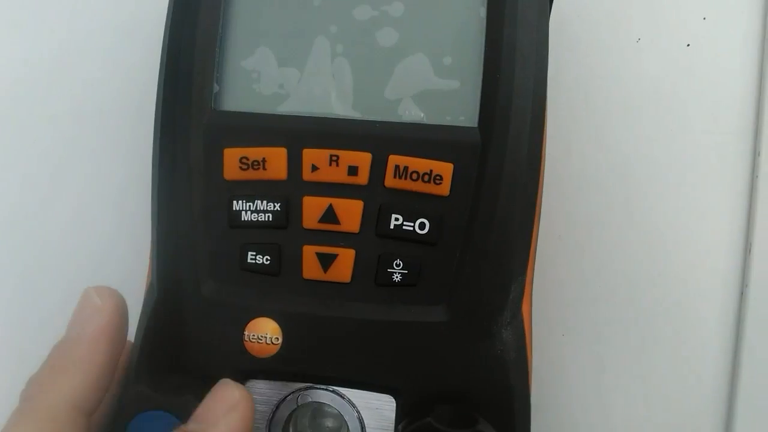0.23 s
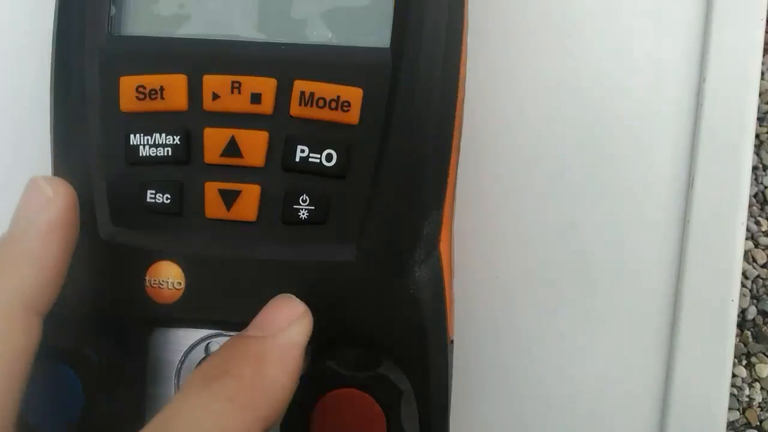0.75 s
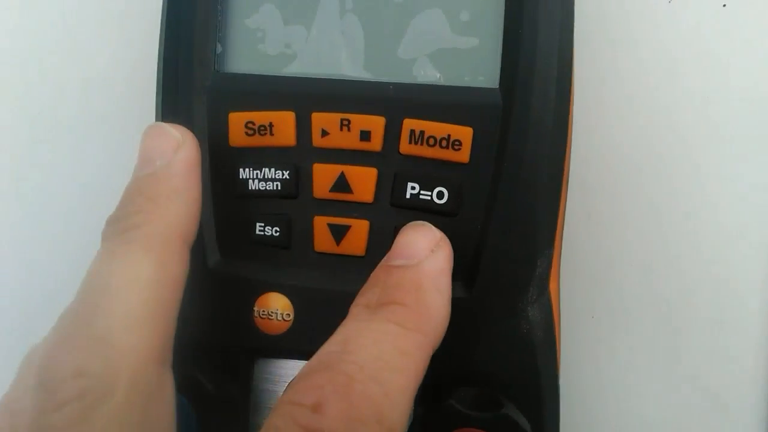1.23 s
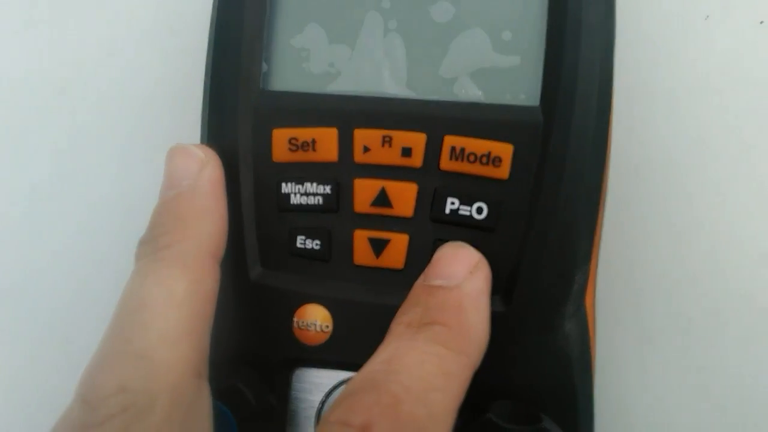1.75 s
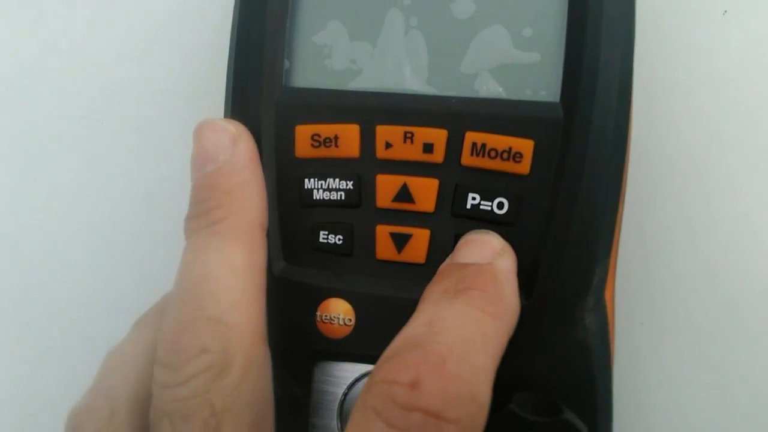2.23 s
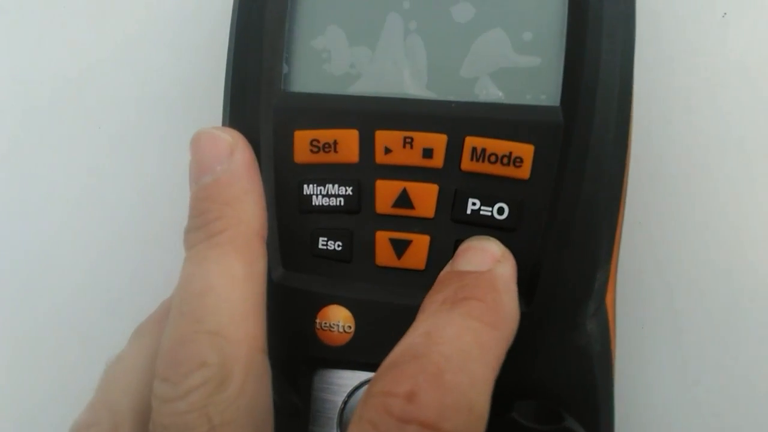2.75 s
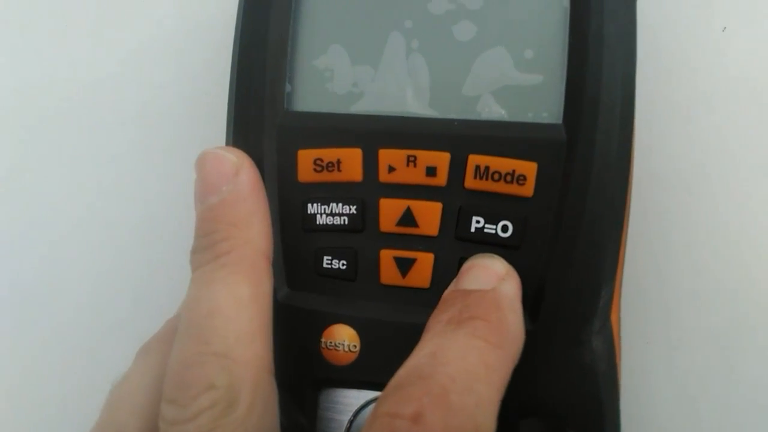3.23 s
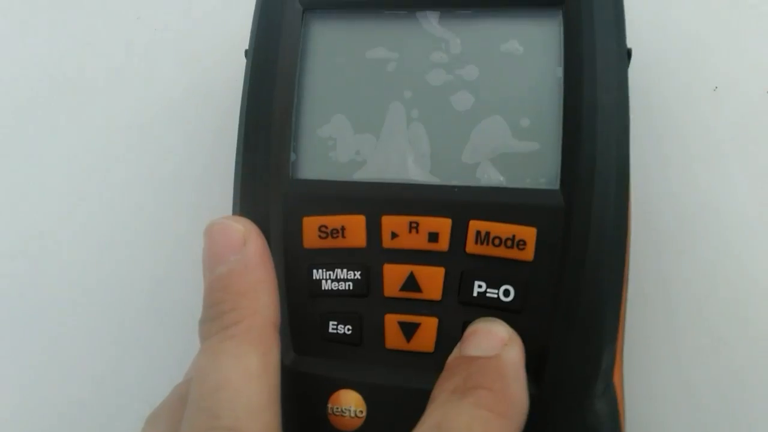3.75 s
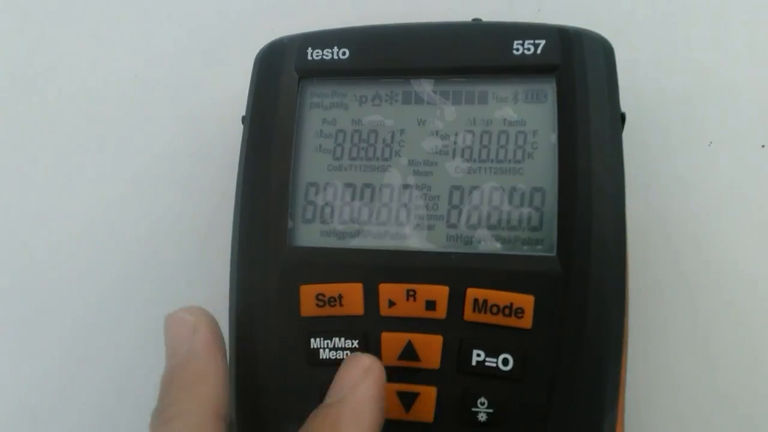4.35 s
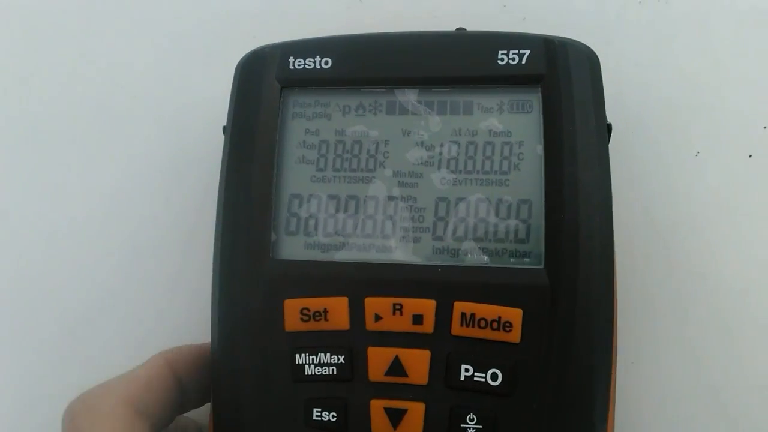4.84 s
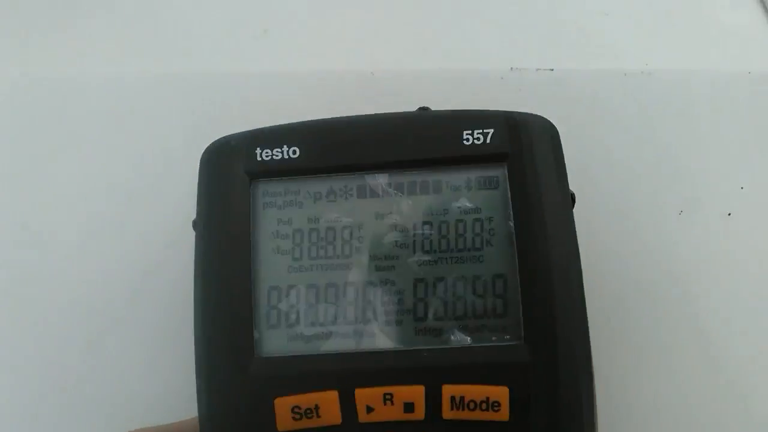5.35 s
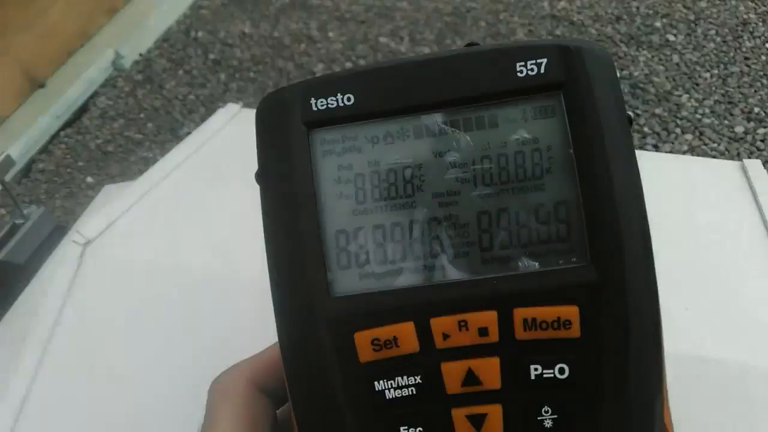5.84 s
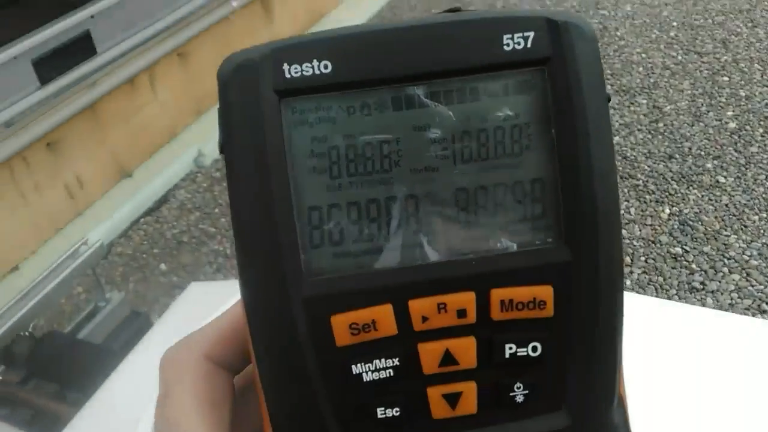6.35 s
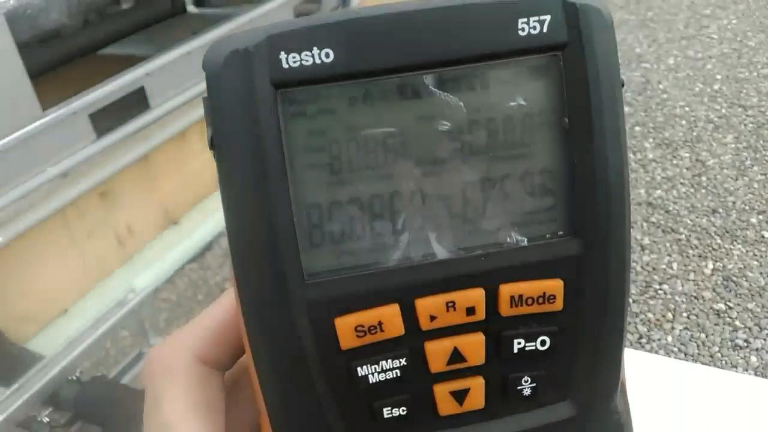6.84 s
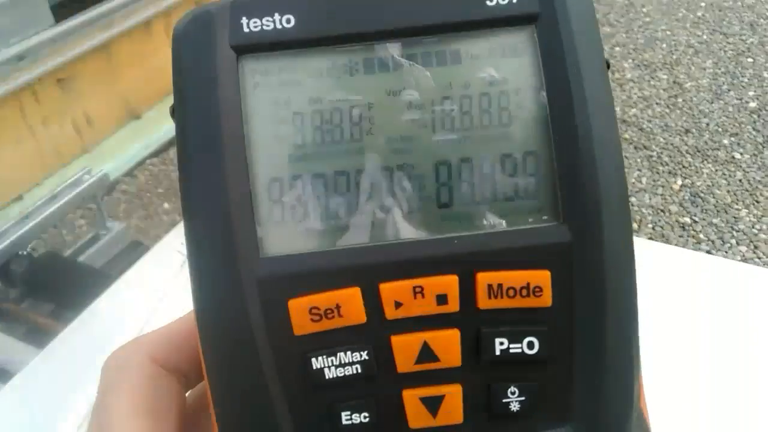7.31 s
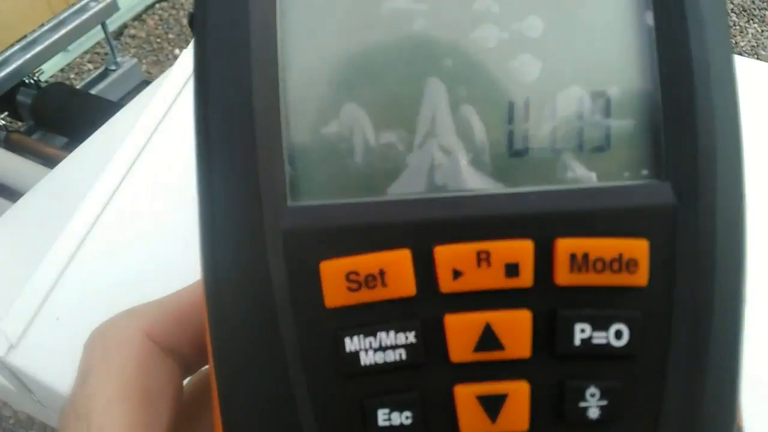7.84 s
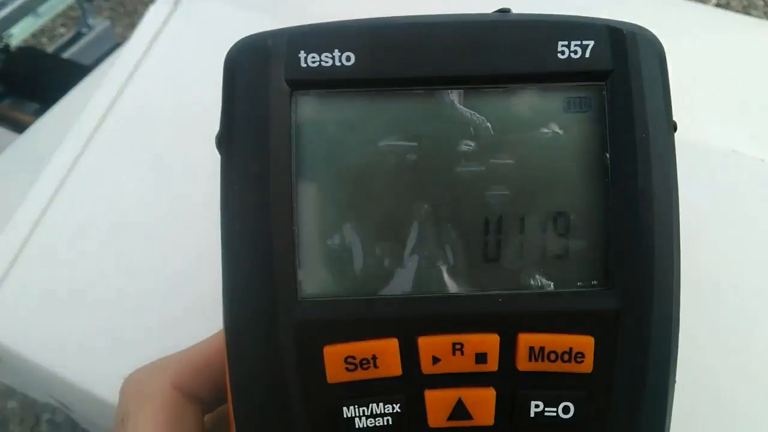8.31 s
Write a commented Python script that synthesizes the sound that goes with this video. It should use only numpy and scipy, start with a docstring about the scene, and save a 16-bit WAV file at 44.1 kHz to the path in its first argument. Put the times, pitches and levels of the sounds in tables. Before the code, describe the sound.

From 0 s a rooftop compressor and fan hum quietly, dipping slightly around 0.3 s and then swelling. Low tones around 150 Hz beat about eight times a second, a quick throb under a steadier mid-low drone, faint whine and rushing fan air. Gusts bulge near 0.6, 1 and 3.3 s. Soft, dull knocks cluster at 1.0-1.1 s, with smaller ones near 2, 2.8 and 3.3 s. From about 3.8 to 3.95 s everything cuts to silence, then returns abruptly, near full loudness. From 5.1 to 6.3 s the microphone rises over the casing: drone and motor hum fade, whine and airy hiss open up. Short sharper ticks land at 6.7 and 7.7 s. Toward 8.6 s the hum partly returns, still loud, ending without a fade. A coarse, gritty high sizzle from the poor microphone covers it throughout; no room echo.

```python
"""A rooftop condensing unit drones beside a hand-held camera: compressor and fan hum beat together.
The tones are sums of cosines; the air rushing through the coil is shaped noise, stronger or weaker in gusts.
All swells; as the camera rises above the casing the drone fades and the hiss opens. A few light knocks ring.
The recorder holds each sample of a telephone-rate stream, which adds a gritty sizzle, and drops out once."""
import sys
import numpy as np
from scipy import signal
from scipy.fft import rfft, irfft
from scipy.io import wavfile
from scipy.ndimage import uniform_filter1d, map_coordinates

SR = 44100
rng = np.random.default_rng(int(sys.argv[2]) if len(sys.argv) > 2 else 0)


def int16_out(signal):
    """Quantize to a 16-bit WAV file."""
    q = np.round(np.clip(np.atleast_2d(signal).T, -1, 1) * 32767)
    wavfile.write(sys.argv[1], SR, q.astype(np.int16))


N = 378378
TIME = np.arange(N) / SR  # s
# grid of the patchy noise: start of each frame in s, frequency of each bin in Hz
FRAME_S = np.arange(N // 256 + 5)[:, None] * 256 / SR
BIN_HZ = np.fft.rfftfreq(1024, 1 / SR)

# turns of the compressor shaft, passing fan blades and mains cycles per second
SHAFT_HZ, BLADE_HZ, MAINS_HZ = 29.378, 77.395, 60.01
# a crest of both throb tones, and how late the stream resumes (s)
THROB_AT, SLIP = 0.048, 0.064
# sample rate of the recorder's stream, and upper edge of the finished sound
STREAM_HZ, EDGE_HZ = 8000, 15800

# Tone levels are averages over the scene, before the recorder.
# low compressor tones: [multiple of the shaft rate, level/dB]
SHAFT_LOW = [(2, -36), (3, -40.5), (4, -26.5), (6, -31), (8, -41)]
# strong compressor drone: [multiple of the shaft rate, level/dB]
SHAFT_DRONE = [(9, -25)]
# middle compressor tones: [multiple of the shaft rate, level/dB]
SHAFT_MID = [(10, -42), (13, -43), (15, -51), (16, -53), (17, -52), (18, -51), (20, -51), (21, -47),
             (22, -45), (24, -48), (25, -50), (29, -52)]
# compressor whine: [multiple of the shaft rate, level/dB]
SHAFT_HIGH = [(34, -57), (38, -58), (44, -56), (47, -46.5), (52, -61), (60, -61), (62, -61)]
# fan tones: [multiple of the blade rate, level/dB]
BLADE_TONES = [(1, -40), (4, -40), (5, -40)]
# magnetic hum of the motor: [multiple of the mains rate, level/dB]
MAGNETIC_HUM = [(6, -29), (12, -67)]
# other steady tones of the casing: [f/Hz, level/dB]
CASING_TONES = [(246.9, -45), (254.8, -45), (301.3, -46), (418, -47), (477.5, -46), (506.9, -45.5),
                (595.1, -52), (653.7, -47), (866.9, -55), (1131.3, -57)]
# spectrum shapes of the three parts of the air noise: [f/Hz, relative level per Hz/dB]
RUMBLE_SHAPE = [(15, -24), (40, -29.5), (55, -5.5), (70, -7), (85, -3.5), (125, -0.5), (165, -4.5),
                (210, -4), (300, -26), (500, -37)]
RUSH_SHAPE = [(100, -31), (200, 2), (320, 4), (450, 0), (580, -2.5), (720, -1), (900, -9.5), (1200, -17.5),
              (2000, -20)]
HISS_SHAPE = [(400, -35), (850, 6.5), (1200, 4.5), (1600, 2.5), (2000, 1), (2400, -0.5), (2900, -5.5),
              (3400, -11.5), (3800, -18)]
# swell of the whole sound, of which each layer takes a share: [t/s, level/dB]
SWELL = [(0, -15.5), (.3, -17), (.7, -13), (1.2, -9), (1.65, -4.5), (2.3, -5.5), (3.2, -2), (4.2, -0.06),
         (5.4, -0.04), (6.3, 0.5), (7.3, -1.5), (8.0, 0.2), (8.58, 0)]
# microphone rising from beside the casing to above its top edge, then part way back: [t/s, lift 0-1]
LIFT = [(5.1, 0), (5.7, 0.23), (6.3, 0.99), (6.8, 1), (7.5, 0.82), (8.1, 0.73), (8.58, 0.4)]
# gusts of fan air, full size before each layer's share: [crest t/s, length/s, air level/dB, throb level/dB]
GUSTS = [(.58, 0.23, 7, -0.5), (0.983, 0.39, 10.5, 3.5), (1.707, 0.39, 2, 2), (2.097, 0.24, 2, 3),
         (2.72, 0.71, -2, 3), (3.284, 0.25, 8, 2.5), (3.676, 0.23, 0, 3), (4.4, .4, 2, -1),
         (4.88, 0.2, 2, -0.5), (5.548, 0.52, 4, 2.5), (6.12, 0.23, -5, 5.5), (7.206, 0.19, 5, 2),
         (7.78, 0.3, 5.5, 3.5), (8.095, 0.14, 4, 4)]
# light knocks of handling, before the recorder: [t/s, peak level/dB, middle f/Hz, time to fall 60 dB/s]
KNOCKS = [(0.986, -18, 345, 0.1), (1.023, -17, 350, 0.075), (1.126, -23, 350, .06),
          (2.045, -27.5, 720, 0.057), (2.817, -17.5, 714, 0.025), (3.264, -20, 810, 0.016),
          (6.692, -13.5, 910, .018), (7.719, -20, 1110, .013)]
# silent stretch of the stream: [start t/s, end t/s]
DROPOUT = (3.8125, 3.949)


def machine(clock):
    """Compressor, fan and motor tones; above the casing drone and motor hum fade and the whine comes through."""
    low = throb(clock, shaft_db=-25.0, fan_db=-22.5, surge_db=2.3)
    # the low shaft tones crest together: one soft thud for each turn of the compressor
    low += tones(SHAFT_LOW, SHAFT_HZ, clock - THROB_AT, waver=0.06, scatter=0.14)
    low += tones(BLADE_TONES, BLADE_HZ, clock, waver=0.68)
    drone = tones(SHAFT_DRONE, SHAFT_HZ, clock, waver=0.1)
    panels = tones(SHAFT_MID, SHAFT_HZ, clock, waver=0.35)
    panels += tones(CASING_TONES, 1, clock, waver=0.35)
    whine = tones(SHAFT_HIGH, SHAFT_HZ, clock, waver=0.25)
    magnetic = tones(MAGNETIC_HUM, MAINS_HZ, clock, waver=0.073)
    # evened gain curves move each layer over time but keep its average level
    return (low * evened(path(swell=0.97, lift_db=-2.0, throb_gust=1))
            + drone * evened(path(swell=0.96, lift_db=-8.5))
            + panels * evened(path(swell=1.3, lift_db=-6))
            + whine * evened(path(swell=1.15, lift_db=7.0))
            + magnetic * evened(path(swell=0.82, lift_db=-12)))


def throb(clock, shaft_db, fan_db, surge_db):
    """Five times the shaft rate and twice the blade rate lie 8 Hz apart and beat; some beats surge more."""
    angle = 2 * np.pi * (clock - THROB_AT)
    shaft = gain_of(shaft_db) * np.cos(5 * SHAFT_HZ * angle)
    fan = gain_of(fan_db) * np.cos(2 * BLADE_HZ * angle)
    surge = evened(gain_of(surge_db * wander(7.4)))
    return np.sqrt(2) * surge * (shaft + fan)


def tones(rows, base_hz, clock, waver, scatter=1):
    """Steady tones wavering in strength and phase; with little scatter (in turns) they crest together."""
    knots = np.arange(0, TIME[-1] + 1, 1 / 8)  # eight random points a second
    out = np.zeros(N)
    for multiple, db in rows:
        angle = 2 * np.pi * (multiple * base_hz * clock + scatter * rng.random())
        strength = 1 + np.interp(TIME, knots, waver * rng.standard_normal(len(knots)))
        drift = np.interp(TIME, knots, waver * rng.standard_normal(len(knots)))
        out += gain_of(db) * np.sqrt(2) * strength * np.cos(angle + drift)
    return out


def air(clock, rumble_db, rush_db, hiss_db, flutter_db, chop,
        ripple_hz, ripple_beside_db, ripple_above_db, lumps_db):
    """Turbulent fan air; the upper parts come in lumps, flutter and pulse with the compressor strokes."""
    rumble_gain = gain_of(rumble_db) * path(swell=0.94, lift_db=-3, air_gust=1)
    rush_gain = gain_of(rush_db) * path(swell=1.25, lift_db=-5.5, air_gust=0.18)
    hiss_gain = gain_of(hiss_db) * path(swell=1.21, lift_db=5.5)

    strokes = 1 + chop * np.cos(2 * np.pi * 6 * SHAFT_HZ * clock)  # six per turn
    unsteady_db = flutter_db * wander(110) + lumps_db * wander(7.5)
    flutter = evened(gain_of(unsteady_db) * strokes)

    # an echo about 1 ms late ripples the hiss; peaks turn into notches above the casing
    lift = np.interp(FRAME_S, *np.transpose(LIFT))
    ripple_depth_db = ripple_beside_db * (1 - lift) + ripple_above_db * lift
    ripple_db = ripple_depth_db * np.cos(2 * np.pi * BIN_HZ / ripple_hz)

    rumble = rumble_gain * low_noise(RUMBLE_SHAPE)
    rush = rush_gain * noise(RUSH_SHAPE, patchy_db=2.8)
    hiss = hiss_gain * noise(HISS_SHAPE, patchy_db=2.7, colour_db=ripple_db)
    return rumble + flutter * (rush + hiss)


def noise(points, patchy_db, colour_db=0):
    """Noise of rms 1 with the given spectrum; eddies lift or lower patches some 300 Hz by 50 ms."""
    f, db = np.transpose(points)
    real, imaginary, eddies = rng.standard_normal((3, len(FRAME_S), len(BIN_HZ)))
    eddies = uniform_filter1d(eddies, size=9, axis=0)  # smooth over time
    eddies = evened(uniform_filter1d(eddies, size=7, axis=1))  # smooth over frequency
    shape_db = np.interp(np.log(BIN_HZ + 1), np.log(f), db, left=-80, right=-80)
    frames = (real + 1j * imaginary) * gain_of(shape_db + patchy_db * eddies + colour_db)
    return evened(signal.istft(frames.T, nperseg=1024, noverlap=768)[1][:N])


def low_noise(points):
    """Even noise of rms 1, with a spectrum fine enough for the bass."""
    f, db = np.transpose(points)
    hz = np.fft.rfftfreq(N, 1 / SR)
    shape_db = np.interp(np.log(hz + 1), np.log(f), db, left=-80, right=-80)
    return evened(irfft(rfft(rng.standard_normal(N)) * gain_of(shape_db), N))


def knocks(spread=0.26, count=6):
    """Each knock rings a small cluster of quickly dying tones around its middle pitch."""
    out = np.zeros(N)
    t = np.arange(SR // 5) / SR
    for s, db, hz, t60 in KNOCKS:
        offsets = np.linspace(-1, 1, count) + rng.uniform(-0.2, 0.034, count)
        modes_hz = hz * (1 + spread * offsets)
        turns = modes_hz[:, None] * t + rng.random((count, 1))
        ring = np.sin(2 * np.pi * turns).sum(0)
        ring *= 1000 ** (-t / t60) * (1 - np.exp(-t / 0.001))  # fast start, then decay
        out[round(s * SR):][:len(t)] += gain_of(db) * ring / abs(ring).max()
    return out


def path(swell, lift_db, air_gust=0, throb_gust=0):
    """Gain curve of one layer: its share of the swell, its change above the casing, its share of the gusts."""
    db = swell * np.interp(TIME, *np.transpose(SWELL))
    db += lift_db * np.interp(TIME, *np.transpose(LIFT))
    for s, length, air_db, throb_db in GUSTS:
        arch = np.cos(np.pi * np.clip((TIME - s) / length, -0.5, 0.5))
        db += arch * (air_gust * air_db + throb_gust * throb_db)
    return gain_of(db)


def wander(rate_hz):
    """Random curve of rms 1 that moves up to about the given rate."""
    hz = np.fft.rfftfreq(N, 1 / SR)
    return evened(irfft(rfft(rng.standard_normal(N)) / (1 + (hz / rate_hz) ** 4), N))


def evened(x):
    """Scales to rms 1, an average strength of one."""
    return x / np.sqrt(np.mean(x ** 2) + 1e-20)


def gain_of(db):
    """Turns decibels into a factor for the wave's size."""
    return 10 ** (np.asarray(db) / 20)


def scene():
    """The unit's tones and air noise, with the knocks on top."""
    clock = TIME - SLIP * (TIME > DROPOUT[0])  # the stream resumes out of step after its dropout
    moving_air = air(clock, rumble_db=-25.5, rush_db=-25.5, hiss_db=-37.5, flutter_db=1.5, chop=0.082,
                     ripple_hz=900, ripple_beside_db=0.5, ripple_above_db=-0.8, lumps_db=0.96)
    return (machine(clock) + moving_air + knocks())[None]


def record(dry):
    """A telephone-rate stream with one dropout, played as a staircase: the hum is mirrored around 8 kHz."""
    narrow = signal.fftconvolve(dry[0], signal.firwin(301, 0.47 * STREAM_HZ, fs=SR), "same")
    running = (TIME < DROPOUT[0]) | (TIME > DROPOUT[1])
    narrow = narrow * uniform_filter1d(running.astype(float), size=60)  # short fades at the dropout's edges
    # every output sample repeats the latest stream sample
    held_at = np.floor(np.arange(N) * STREAM_HZ / SR) * SR / STREAM_HZ
    stairs = map_coordinates(narrow, [held_at], order=3, mode="nearest")
    edge = signal.firwin(1023, EDGE_HZ, window=("kaiser", 9), fs=SR)
    return signal.fftconvolve(stairs, edge, "same")[None]


dry = scene()
out = record(dry)
int16_out(out)
```